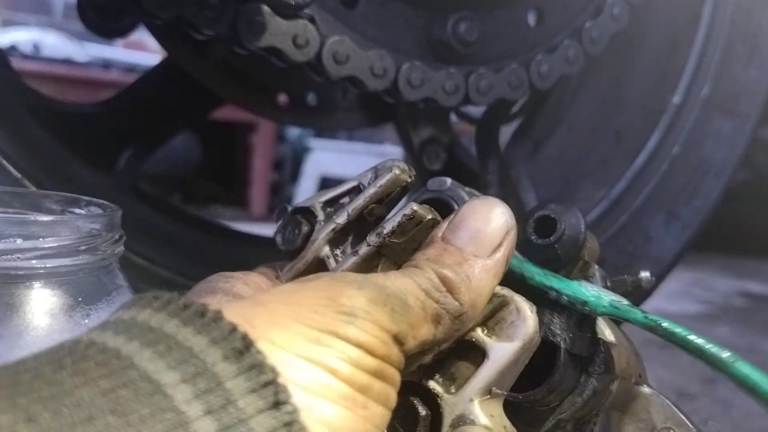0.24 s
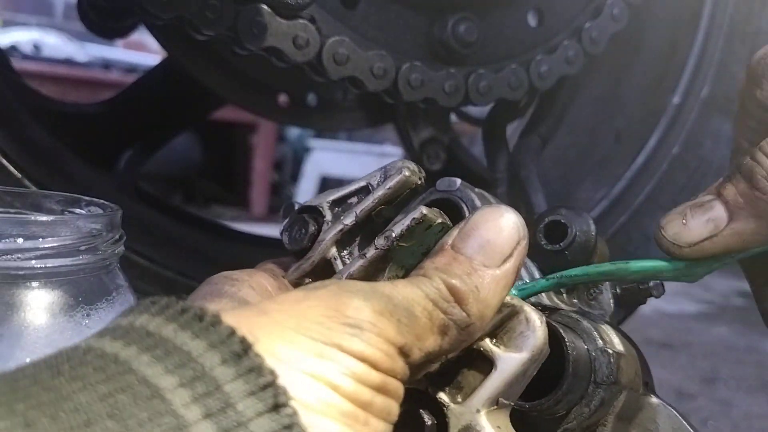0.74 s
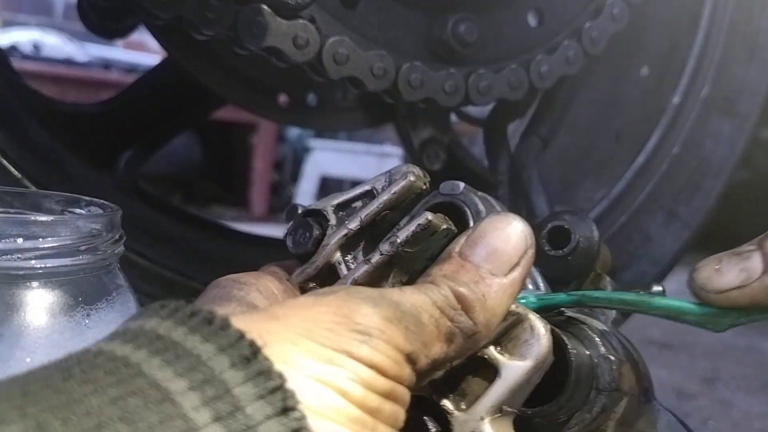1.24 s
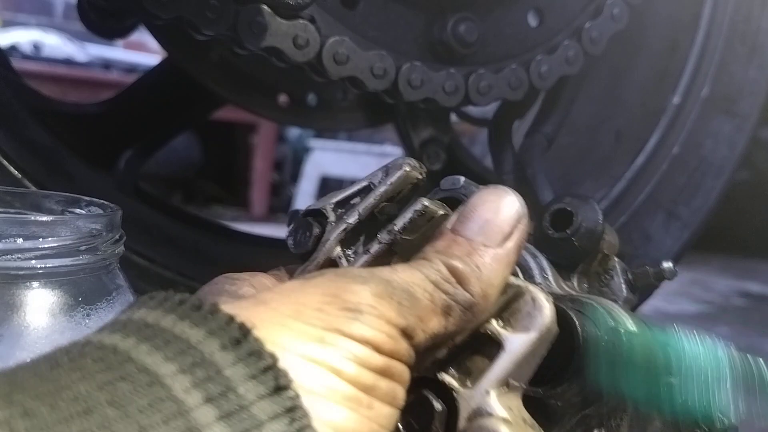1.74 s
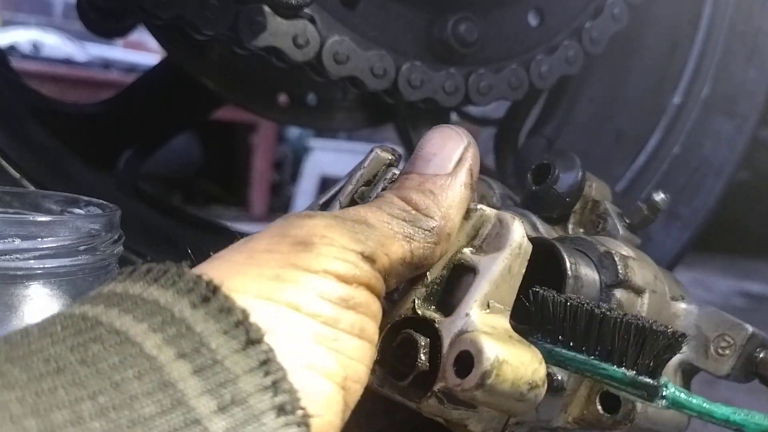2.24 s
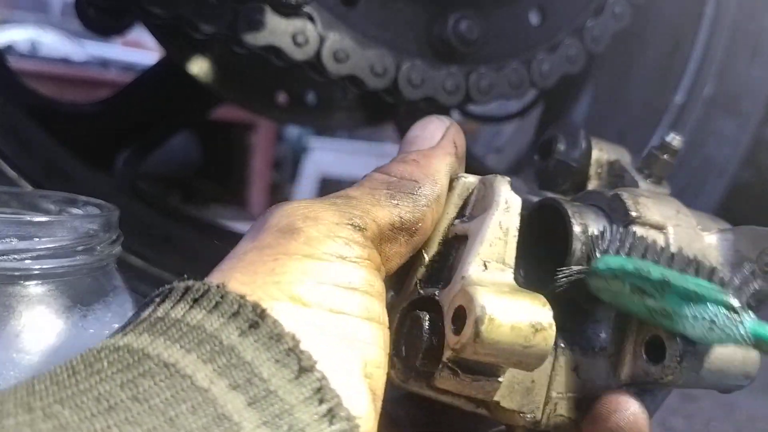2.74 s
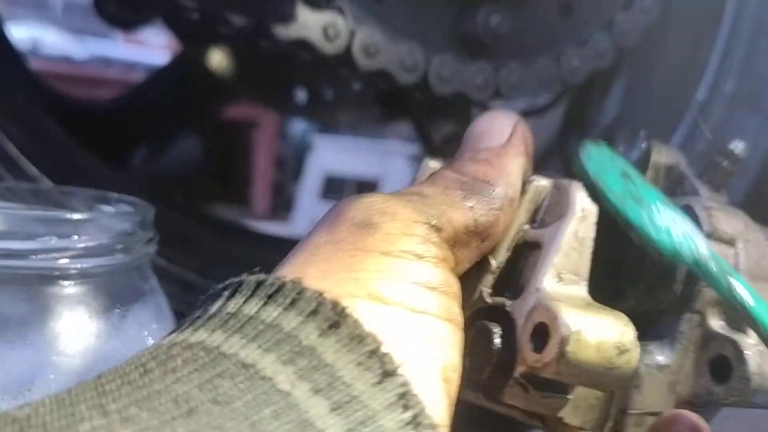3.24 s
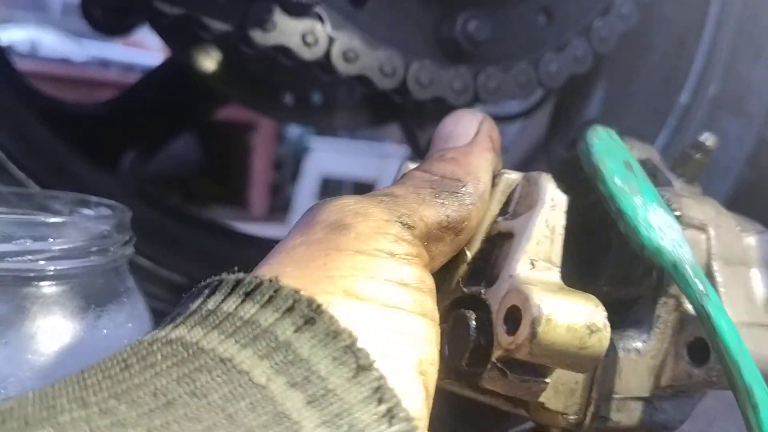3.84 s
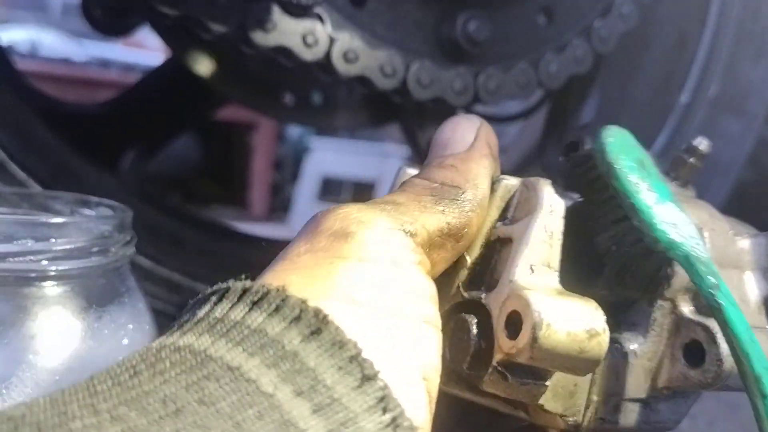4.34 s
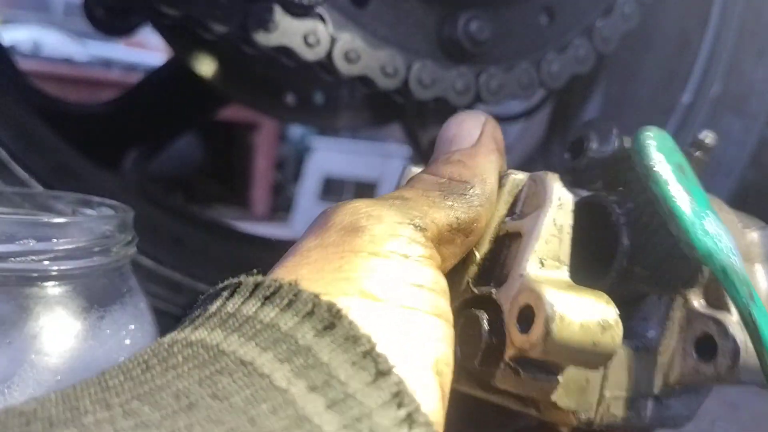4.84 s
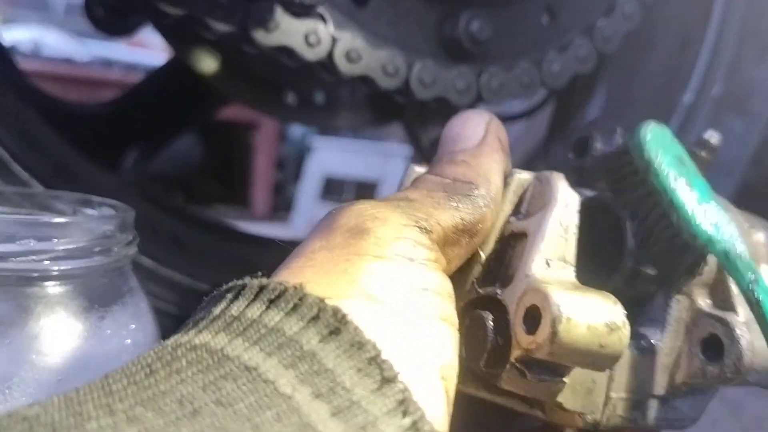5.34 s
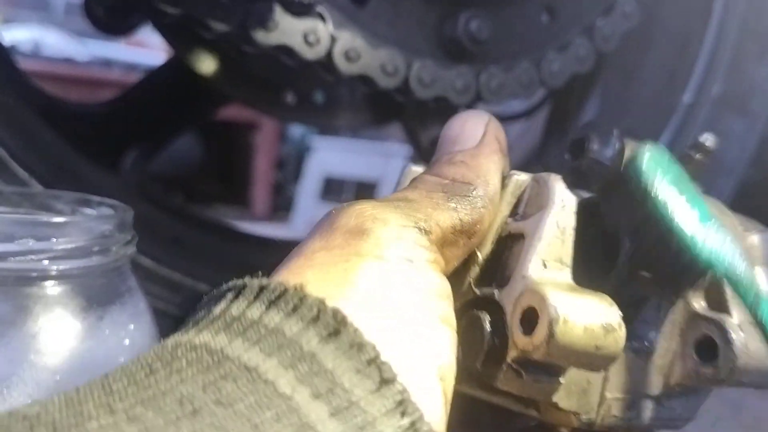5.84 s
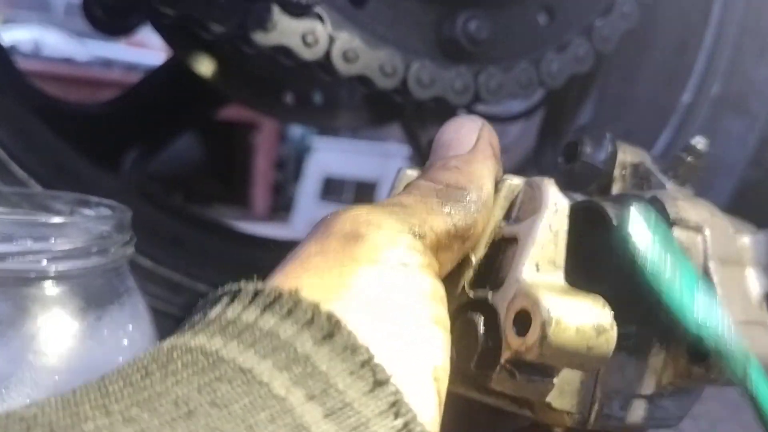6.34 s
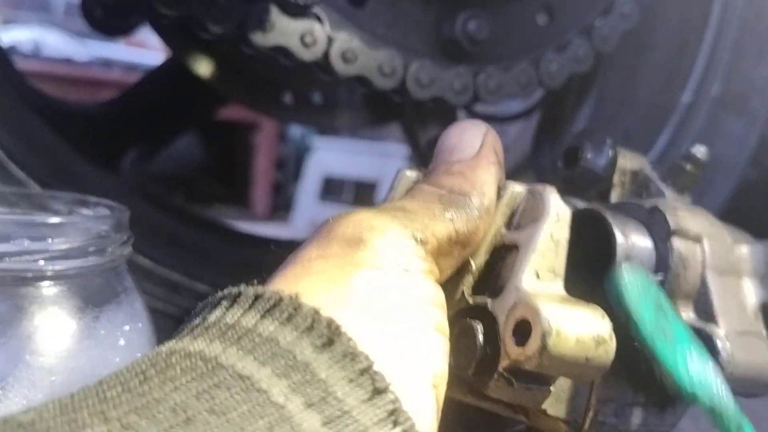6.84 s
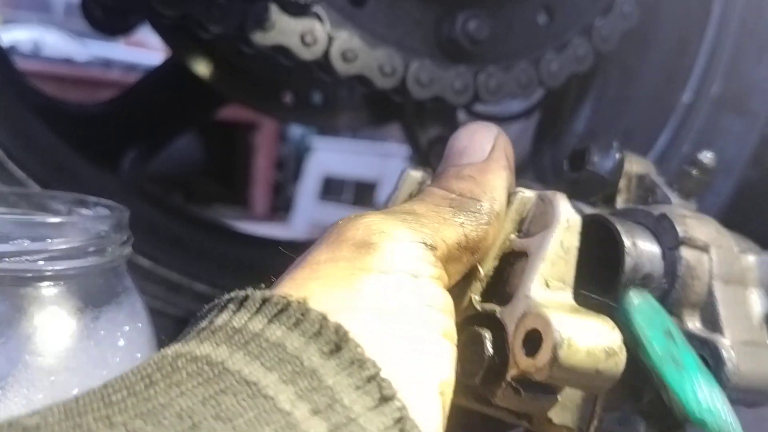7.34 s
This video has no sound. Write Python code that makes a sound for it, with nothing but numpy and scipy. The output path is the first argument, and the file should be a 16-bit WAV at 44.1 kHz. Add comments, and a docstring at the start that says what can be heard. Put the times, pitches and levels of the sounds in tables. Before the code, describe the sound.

Very close, a wet plastic brush scrapes a metal brake caliper in short uneven rasps. A burst of hollow knocks comes just before one second, followed by clicks of the brush head. Around three seconds there is a hard crack, then knocks and two loud drops popping on the microphone with spray. Steady back-and-forth scrubbing follows to the end, hissy and gritty, with faint handling bumps in a quiet workshop.

```python
"""A wet plastic brush scrubs a brake caliper in short back-and-forth strokes, close up in a quiet workshop.
Bristle flicks are random impulses over friction noise, coloured by the casting and swelling with each stroke.
The brush head clicks (filtered noise bursts); the held part knocks (decaying sines) and judders (a low groan).
Drops pop on the microphone as falling sines with noise spray; handling adds low bumps and rustle.
A short noise-tail echo and still air lie behind."""
import sys
import numpy as np
from scipy import signal
from scipy.fft import rfft, irfft, next_fast_len
from scipy.io import wavfile
from scipy.ndimage import uniform_filter1d, map_coordinates

SR = 44100
rng = np.random.default_rng(int(sys.argv[2]) if len(sys.argv) > 2 else 0)


def transcribe(signal):
    """Save signal, clipped to [-1, 1], as a 16-bit WAV file at the path in sys.argv[1]."""
    frames = np.atleast_2d(signal).T
    limited = np.clip(frames, -1, 1)
    pcm = np.round(limited * 32767).astype(np.int16)
    wavfile.write(sys.argv[1], SR, pcm)


N = 334278
T = np.arange(N) / SR


def amp(db):
    """Decibels to gain."""
    return 10 ** (np.asarray(db) / 20)


def unit(x):
    """Scale to rms 1."""
    return x / np.sqrt(np.mean(x ** 2) + 1e-20)


def along(points, hz):
    """Interpolate (Hz, value) points on a log frequency axis."""
    f, v = np.transpose(points)
    return np.interp(np.log(hz + 1), np.log(f + 1), v)


def filtered(x, response):
    """x times a complex response of frequency."""
    n = x.shape[-1]
    padded = next_fast_len(n + 8192)
    spectrum = rfft(x, padded) * response(np.fft.rfftfreq(padded, 1 / SR))
    return irfft(spectrum, padded)[..., :n]


def resonances(modes, f):
    """Causal response of (centre Hz, width Hz, dB) resonances."""
    return sum(amp(db) * 1j * f * w / (c * c - f * f + 1j * f * w) for c, w, db in modes)


def wobble(rate):
    """A smooth random curve, rate knots a second."""
    knots = rng.standard_normal(int(N * rate / SR) + 4)
    return map_coordinates(knots, [T * rate], order=2)


def stereo(pair, response):
    """Colour two unrelated signals and blend them into left and right, rms 1."""
    # left-right likeness: freq_hz, correlation
    likeness = [(60, 1), (300, 0.79), (700, 0.345), (1400, 0.31), (3100, 0.89), (6800, 0.49), (15000, 0.13)]

    def mid_side(f):
        turn = np.arccos(np.clip(along(likeness, f), -1, 1)) / 2
        return response(f) * np.array([np.cos(turn), np.sin(turn)])

    mid, side = filtered(pair, mid_side)
    return unit(np.array([mid + side, mid - side]))


def noise(spectrum):
    """Smooth stereo noise of rms 1, coloured by (Hz, dB) points."""
    return stereo(rng.standard_normal((2, N)), lambda f: amp(along(spectrum, f)))


def swells(rows, edge=2):
    """Envelope of rounded swells, rows (s, rise, fall, dB); a higher edge gives flatter tops and steeper ends."""
    t, power = T[::32], 0
    for s, rise, fall, db in rows:
        distance = np.abs((t - s) / np.where(t < s, rise, fall))
        power = power + amp(db) ** 2 * np.exp(-distance ** edge)
    return np.interp(T, t, np.sqrt(power))


def add(track, s, sound):
    """Mix a sound into the track at time s."""
    part = track[:, round(s * SR):][:, :sound.shape[-1]]
    part += sound[..., :part.shape[-1]]


def brush():
    """Each stroke speeds up and stops; its flicks rasp, ring the piston, scrape, hiss and fizz with the wet."""
    # bristles on the casting: freq_hz, level_db (per Hz)
    rasp_bands = [(300, -7.5), (700, -18), (1250, -11), (1640, -5.5), (1900, -4), (2300, -7), (2600, -7.5),
                  (3200, -15), (5000, -73.5)]
    scrape_bands = [(1500, -45), (2700, -35), (3200, -2), (4300, -1.5), (4700, -2.5), (5100, -12.5),
                    (6500, -37)]
    hiss_bands = [(3500, -32.5), (5100, -10), (5600, 6.5), (6000, 2), (6550, 5.5), (7100, -0.5),
                  (7900, 3.5), (8700, -3), (11000, -15), (15800, -13.5)]
    # fizz of the wet bristles: freq_hz, level_db (per Hz)
    fizz_bands = [(7000, -35.5), (9000, -4.5), (10200, 0.5), (12300, 1.5), (13500, 1.5), (15800, -1.5)]
    # fizz level over time: time_s, level_db
    wetness = [(0, 12), (.4, -7.5), (.8, -4.5), (1.75, 4.5), (2.4, -13), (2.9, 0), (3.7, 1.5), (6.3, 4),
               (7.5, 1)]
    # ring of the steel piston: centre_hz, width_hz, level_db
    piston_modes = [(2136, 38, -2), (1870, 41, -9.5)]
    # the tuft rides on the piston: time_s, share (0-1)
    on_piston = [(3.85, 0.3), (4.0, 0.9), (4.55, 0.89), (4.95, 0.18), (6.6, .1), (7.1, 0.48)]
    # hollows of the casting: centre_hz, width_hz, level_db
    bore_modes = [(1570, 120, -10.5), (2390, 80, -10), (3210, 170, -21.5), (4048, 150, -10.5),
                  (4280, 120, -8)]
    rasp_db, scrape_db, hiss_db = -5.5, -1.33, 1.9  # against the level of the stroke
    bite_dulls = 0.16  # dB of hiss lost per dB of bite
    rise_share = 0.54  # part of a stroke spent speeding up

    flicks = bristles(rate_hz=3000, spread_db=2.0, smooth=0.91)
    flicks = shifting(flicks, depth_db=6.5, broad_db=2.5)
    flicks = np.array([nearby(side, sway_s=.00008) for side in flicks])

    def voiced(spectrum):
        return stereo(flicks, lambda f: amp(along(spectrum, f)) * (1 + 3.0 * resonances(bore_modes, f)))

    share = np.interp(T, *np.transpose(on_piston))
    ring = stereo(flicks, lambda f: resonances(piston_modes, f))
    rasp = np.sqrt(1 - share ** 2) * voiced(rasp_bands) + share * ring
    fizz = amp(np.interp(T, *np.transpose(wetness))) * voiced(fizz_bands)
    wet_hiss = 0.56 * voiced(hiss_bands) + 0.56 * fizz
    # sound, dB per dB of bite, catch depth dB
    layers = [(amp(rasp_db) * rasp, 1, 1.6),
              (amp(scrape_db) * voiced(scrape_bands), 0, 1.3),
              (amp(hiss_db) * wet_hiss, -bite_dulls, .9)]
    out = 0
    for sound, per_bite, catch_db in layers:
        rows = [(s, rise_share * length, (1 - rise_share) * length, db + per_bite * bite)
                for s, length, db, bite in strokes()]
        speed = swells(rows, edge=2.18)
        tufts = amp(catch_db * (wobble(70) + wobble(240)))  # clumps catch and slip together
        out = out + speed * tufts * sound
    return out


def strokes():
    """Every pass of the brush as (s, length, dB, bite): in steady scrubbing a lighter return follows each push."""
    # bite = tips digging in, not gliding; length scales the swell about its middle
    # single strokes, feeling round the part: mid_s, length_s, level_db, bite_db
    single_strokes = [(.02, 0.062, -63.5, -4), (.125, 0.04, -63.5, -9), (.3, 0.45, -68.5, 4.5),
                      (.578, 0.052, -53, 2), (.683, 0.061, -54, 7.5), (.8, 0.088, -58.5, 4),
                      (.951, 0.077, -55, 3), (1.063, 0.046, -48, 2.5), (1.2, 0.088, -53, -0.5),
                      (1.325, 0.077, -55, 3.5), (1.456, 0.062, -54, 1), (1.555, 0.052, -55.5, 1),
                      (1.607, 0.038, -51.5, 14), (1.745, 0.15, -54, 1), (1.856, 0.047, -53.5, 0.5),
                      (2.327, 0.033, -61.5, 8), (2.52, .14, -63.5, 13.5), (2.796, 0.097, -49.5, -3.5),
                      (2.918, 0.034, -48, -2), (3.043, 0.076, -58.5, 11.5), (3.287, 0.06, -53, 17.5),
                      (3.398, 0.072, -42, 6.5), (3.725, 0.09, -48, -2.5)]
    # pushes of the steady scrubbing: mid_s, length_s, level_db, bite_db
    pushes = [(4.012, 0.1, -52, 5), (4.282, 0.067, -48.5, 7.5), (4.534, 0.06, -51.5, 7),
              (4.786, 0.047, -50, 0), (5.027, 0.066, -49, -2.5), (5.292, 0.081, -48.5, -2),
              (5.568, 0.068, -49, -3), (5.834, 0.056, -48, 1), (6.088, 0.07, -49.5, -0.5),
              (6.355, 0.068, -49, 2), (6.621, 0.066, -47.5, 1), (6.889, 0.059, -48, 2.5),
              (7.148, 0.066, -48.5, -0.5), (7.406, 0.062, -48, 2)]
    return_at, return_db, return_length_s = .47, -5, 0.064  # share of the way to the next push; dB re push
    starts = np.transpose(pushes)[0]
    cycles = np.diff(starts, append=starts[-1] + np.diff(starts).min())
    returns = [(s + return_at * cycle, return_length_s, db + return_db, bite)
               for (s, _, db, bite), cycle in zip(pushes, cycles)]
    return single_strokes + pushes + returns


def bristles(rate_hz, spread_db, smooth):
    """Tiny flicks of uneven size as single bristles let go, over smooth sliding friction."""
    sizes = amp(spread_db * np.clip(rng.standard_normal(N), -2, 2))
    flicks = (rng.random(N) < rate_hz / SR) * sizes
    return (unit(flicks) + smooth) * rng.standard_normal((2, N))


def shifting(x, depth_db, broad_db):
    """The colour shifts at random, in narrow peaks and broad humps."""
    z = signal.stft(x, nperseg=1024)[2]

    def blurred(bins, frames):
        grain = rng.standard_normal(z.shape[1:])
        return unit(uniform_filter1d(uniform_filter1d(grain, size=bins, axis=0), size=frames, axis=1))

    fine = np.minimum(blurred(bins=3, frames=9), 1)
    broad = blurred(bins=26, frames=6)
    gain = amp(depth_db * fine + broad_db * broad)
    return unit(signal.istft(z * gain, nperseg=1024)[1][:, :N])


def nearby(x, sway_s):
    """Close surfaces comb the sound; their paths drift as the hands move."""
    # echoes off the hand, wheel and floor: delay_s, level_db
    walls = [(.0011, -13), (.0029, -12.5), (.0047, -20.5)]
    out = x
    for delay_s, db in walls:
        out = out + amp(db) * np.interp(T - delay_s - sway_s * wobble(3), T, x)
    return out


def clicks():
    """Hard plastic on the casting: a brief crack, cushioned by the bristles, and a little metal ring."""
    # brush head on metal: start_s, level_db (peak is 1 dB higher), centre_hz, t60_s
    click_rows = [(1.0842, -16, 1950, 0.019), (1.742, -29, 7500, .013), (1.871, -35.5, 8860, .03),
                  (2.1687, -23.5, 3700, 0.0084), (2.318, -39, 2870, 0.026), (2.427, -32.5, 3300, 0.009),
                  (2.746, -38.5, 4030, .04), (2.911, -31, 9100, 0.031), (2.926, -31.5, 12070, 0.026),
                  (2.983, -9, 5800, 0.0088), (3.03, -25, 2830, .016), (3.0489, -18, 3700, 0.014),
                  (3.733, -24, 5580, 0.034), (3.946, -36, 4020, 0.028), (5.413, -30, 11500, 0.039),
                  (5.598, -38, 2430, .025), (5.678, -31, 10950, 0.062), (6.873, -29, 3960, .009)]
    # ring of the casting: centre_hz, width_hz, level_db
    casting_modes = [(1330, 420, -4), (1605, 360, 5.5), (1920, 130, 4.5), (2440, 100, -16.5),
                     (3690, 220, 6.5), (4130, 67, -10), (5300, 110, -16), (5430, 460, -18.5),
                     (6700, 160, -33), (11350, 200, 1.5)]
    out, t = np.zeros((2, N)), np.arange(SR // 8) / SR
    for s, db, hz, t60 in click_rows:
        decay = amp(-60 * t / t60) + .006 * amp(-60 * t / 0.11)
        contact = decay * (1 - np.exp(-t / 0.0011))
        burst = rng.standard_normal((2, len(t))) * contact

        def tip(f):
            return resonances([(hz, 0.77 * hz, 0)], f) / np.sqrt(1 + (f / (2.4 * hz)) ** 6)

        click = stereo(burst, lambda f: tip(f) * (.5 + resonances(casting_modes, f)))
        add(out, s - .0003, amp(db + 1.0) * click / np.abs(click).max())
    return out


def knocks():
    """Each blow is a fast-dying clack and a weaker hollow ring; softer blows are duller."""
    # hollow modes of the part: freq_hz, mean level_db, t60_s (before damping by the hand)
    hollow_modes = [(282, -13.5, 0.34), (477.7, 2, 0.17), (593, 6, 0.14), (848, 5.5, 0.017),
                    (1022, -7.5, 0.21), (1170, -21.5, 0.12), (1302, 0.5, 0.072), (1700, -11.5, 0.027),
                    (1974, -11.5, 0.092), (2437, -2, 0.031), (3010, -7.5, 0.08), (4030, -3, 0.057)]
    # first instant of a knock: freq_hz, level_db (per Hz)
    clack_bands = [(150, -26.5), (400, -1.5), (750, 1), (1400, -4), (2000, -9), (4400, -8), (5200, -7.5),
                   (12000, -34)]
    full_scale_hz, db_per_octave = 4800, 8  # brightness against strength of blow
    clack_t60_s, pan_db = 0.043, 3  # pan: left minus right
    out, t = np.zeros((2, N)), np.arange(SR // 4) / SR
    hz, level, t60 = np.transpose(hollow_modes)[:, :, None]
    for s, db in chatter():
        strength = amp(level + 2.8 * rng.standard_normal(hz.shape))
        phase = rng.uniform(0, 2 * np.pi, hz.shape) + 0.5 * rng.standard_normal((2, len(hz), 1))
        modes = strength * amp(-60 * t / t60) * np.sin(2 * np.pi * hz * t + phase)
        ring = np.sum(modes, axis=1)
        crack = stereo(rng.standard_normal((2, len(t))), lambda f: amp(along(clack_bands, f)))
        clack = amp(-60 * t / clack_t60_s)  # the hand soaks up most of the first swing
        blow = (ring * (clack + 0.15) + 1.75 * crack * clack) * (1 - np.exp(-t / .0012))
        bright_hz = np.clip(full_scale_hz * 2 ** (db / db_per_octave), 550, SR / 3)
        blow = signal.lfilter(*signal.butter(2, bright_hz, fs=SR), blow)
        gain = amp(db + np.array([[pan_db], [-pan_db]]) / 2)
        add(out, s, gain * blow / np.abs(blow).max())
    return out


def chatter(count=3):
    """Every contact of the part as (s, dB): each knock and its ever weaker bounces."""
    # knocks of the part: start_s, peak_db (before panning)
    knock_rows = [(0.712, -38), (0.7625, -18.5), (0.8779, -8), (0.8818, -12), (.896, -10.5), (.907, -12.5),
                  (3.255, -14.5), (3.399, -18.5), (3.412, -18), (6.439, -32), (6.455, -32.5)]
    bounce_s, bounce_loss_db = .0095, 10.5  # mean time between contacts, loss at each
    return [(s + bounce_s * k * rng.uniform(.9, 1.1), db - bounce_loss_db * k)
            for s, db in knock_rows for k in range(count)]


def judder(hz=535, waver=0.06):
    """Stick and slip drive the hollow low resonance into a short rough groan, faintly in every stroke."""
    # short judders during or at the end of a stroke: mid_s, half_length_s, level_db
    judder_rows = [(3.405, 0.007, -16.5), (3.437, 0.01, -35), (5.051, 0.019, -47), (5.431, 0.01, -46),
                   (5.585, 0.021, -53), (5.695, .007, -45.5), (5.993, 0.039, -55.5), (6.758, 0.0091, -47.5),
                   (6.815, 0.024, -54), (7.287, 0.0094, -46.5)]
    faint_db = -14.5  # against the level of the stroke
    phase = 2 * np.pi * np.cumsum(hz * (1 + waver * wobble(150))) / SR
    groan = unit((np.sin(phase) + 0.056 * np.sin(2 * phase)) * (1 + 0.23 * wobble(140)))
    grit = noise([(100, -29), (220, -11.5), (350, -6.5), (520, 5.5), (680, -2.5), (900, -29), (2000, -46.0)])
    short = [(s, half, half, db) for s, half, db in judder_rows]
    faint = [(s, length / 2, length / 2, db + faint_db) for s, length, db, bite in strokes()]
    return swells(short + faint) * (0.79 * groan + 0.9 * grit) * amp([[-.8], [.8]])


def drops():
    """A drop shoves the microphone in a swing that slows quickly; the first one bursts into spray and mist."""
    # drops on the microphone: start_s, level_db, pitch_fall_hz (down to 35 Hz), glide_s, swell_s
    pop_rows = [(3.2304, -5.5, 603, 0.0047, 0.0053), (3.341, -3.5, 590, 0.0019, 0.00099)]
    # burst and run-off: freq_hz, level_db (per Hz)
    spray_bands = [(290, -51.5), (500, -10), (1120, 1), (1350, -1), (1630, 0), (3950, -2), (4500, 0.5),
                   (4970, -19.5), (11200, -14), (15800, -20)]
    # fine droplets settling: freq_hz, level_db (per Hz)
    mist_bands = [(5000, -30), (8500, -9), (10300, 14), (12000, -7), (15800, -15)]
    splash_s, splash_rise_s, splash_fall_s, splash_db = 3.243, 0.0059, 0.0054, -13
    settle_s, runoff_db, mist_db = .02, -33.5, -42  # delay after the splash; levels
    out, t = np.zeros((2, N)), np.arange(SR // 8) / SR
    for s, db, hz, glide, swell in pop_rows:
        phase = 2 * np.pi * np.cumsum(35 + hz * np.exp(-t / glide)) / SR
        push = t / swell * np.exp(1 - t / swell) + 0.067 * np.exp(-t / 0.017)
        tick = 0.051 * amp(-60 * t / 0.011) * rng.standard_normal((2, len(t)))
        add(out, s, amp(db) * (tick - push * np.sin(phase)))
    settled_s = splash_s + settle_s
    burst = (splash_s, splash_rise_s, splash_fall_s, splash_db)
    runoff = (settled_s, .011, .018, runoff_db)
    spray = swells([burst, runoff]) * noise(spray_bands)
    mist = swells([(settled_s, 0.017, 0.027, mist_db)]) * noise(mist_bands)
    return out + spray + mist


def handling():
    """Sleeve and hands jostle the camera: each bump is a few uneven low swings in a dull rustle."""
    # handling bumps: mid_s, half_length_s, level_db
    bump_rows = [(1.883, .009, -49), (2.94, 0.018, -48.5), (3.025, .035, -41), (6.123, .01, -37),
                 (6.195, 0.024, -46), (6.703, 0.037, -47.5), (6.906, 0.029, -37.5), (6.97, 0.0038, -26),
                 (7.07, 0.066, -34.5)]
    # rustle: freq_hz, level_db (per Hz)
    rumble_bands = [(15, -15), (25, -8.5), (59, 0.5), (97, -5), (216, -15), (389, -31), (458, -38),
                    (500, -23.5), (650, -56), (1100, -120)]
    full_scale_hz, db_per_octave = 190, 30.5  # softer bumps swing more slowly
    swings = 0
    for s, half, db in bump_rows:
        hz = full_scale_hz * 2 ** (db / db_per_octave + .35 * wobble(60))
        swings = swings + swells([(s, half, half, db)]) * np.sin(2 * np.pi * np.cumsum(hz) / SR)
    rustle = swells([(s, half, half, db) for s, half, db in bump_rows]) * noise(rumble_bands)
    return 1.4 * swings + 0.8 * rustle


def workshop(x):
    """A short echo of decaying noise whose high treble dies first."""
    # decay of the room: freq_hz, t60_s
    room_decay = [(200, 0.15), (2000, 0.18), (10000, 0.1)]
    hz, t, z = signal.stft(rng.standard_normal((2, SR // 3)), SR, nperseg=256)
    decay = amp(-60 * t / along(room_decay, hz)[:, None])
    tail = signal.istft(z * decay, SR, nperseg=256)[1]
    delayed = np.pad(x, ((0, 0), (300, 0)))  # 300 samples
    return signal.fftconvolve(delayed, tail / np.linalg.norm(tail[0]), axes=1)[:, :N]


def still_air():
    """Steady background noise, strongest in the bass."""
    # freq_hz, level_db (per Hz)
    air_bands = [(15, -40), (25, -3.5), (126, -1.5), (333, -13), (572, -15.5), (955, -19), (1040, -19.5),
                 (1120, -20.5), (1320, -20.5), (1930, -32.5), (3780, -31.5), (5090, -31), (5520, -45),
                 (11400, -37.5), (15800, -40)]
    return amp(-56.5) * noise(air_bands)


def scene():
    """The work on the caliper, its echo, things touching the microphone, and still air."""
    work = brush() + clicks() + knocks() + judder()
    return work + amp(-18.5) * workshop(work) + drops() + handling() + still_air()


def record(dry):
    """The camera clips at full scale and keeps nothing above its band limit."""
    top_hz = 15900
    return filtered(np.clip(dry, -1, 1), lambda f: f < top_hz)


dry = scene()
out = record(dry)
transcribe(out)
```